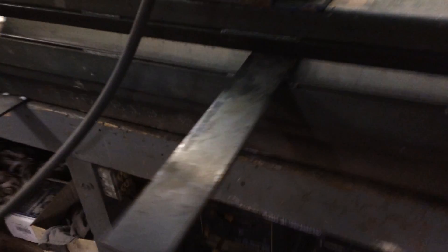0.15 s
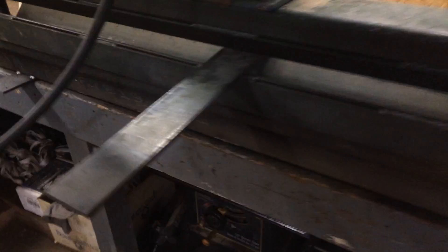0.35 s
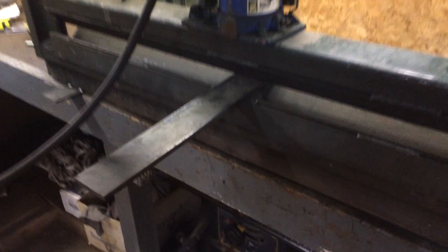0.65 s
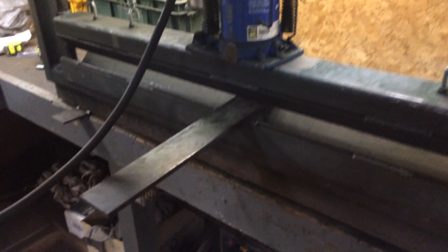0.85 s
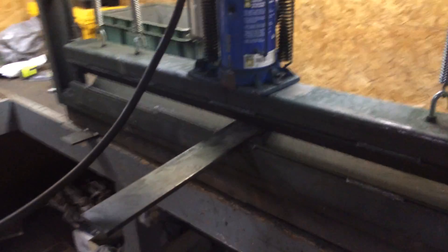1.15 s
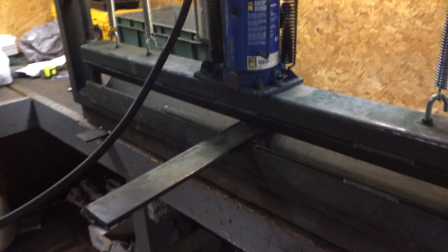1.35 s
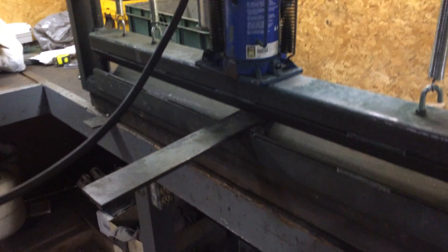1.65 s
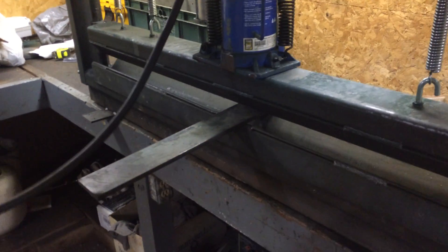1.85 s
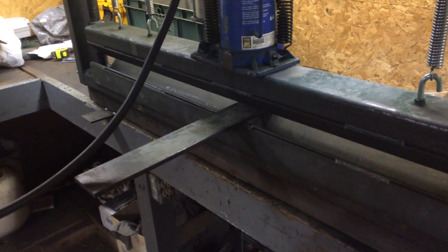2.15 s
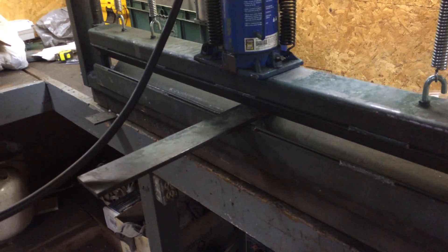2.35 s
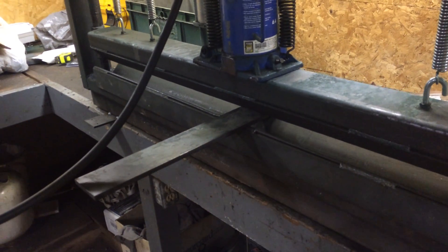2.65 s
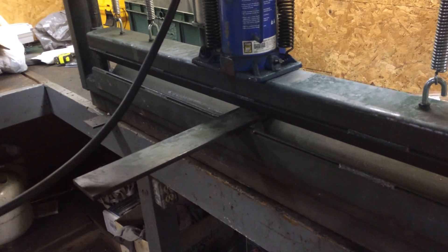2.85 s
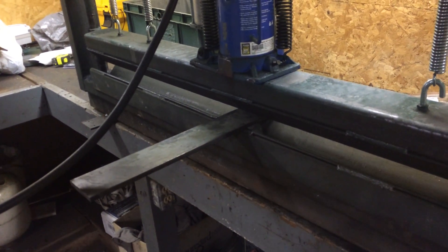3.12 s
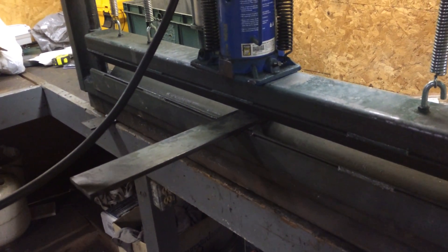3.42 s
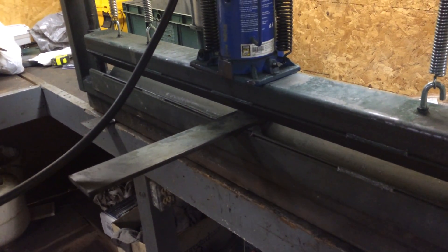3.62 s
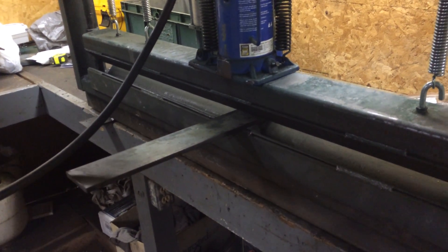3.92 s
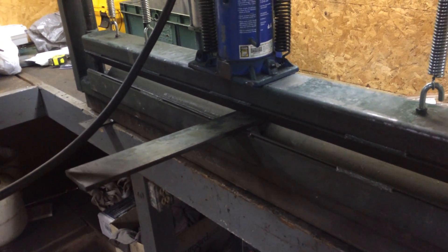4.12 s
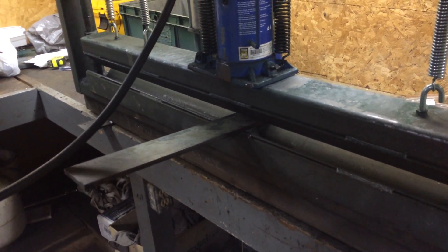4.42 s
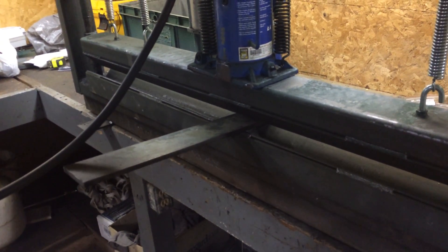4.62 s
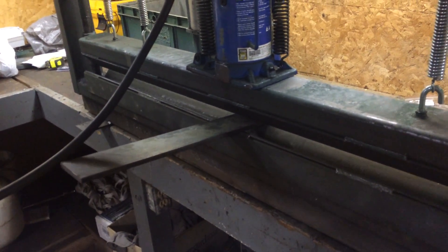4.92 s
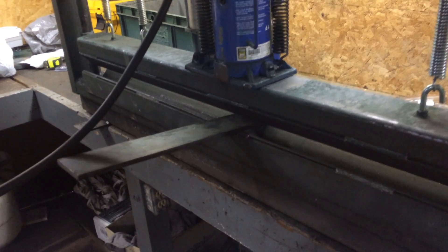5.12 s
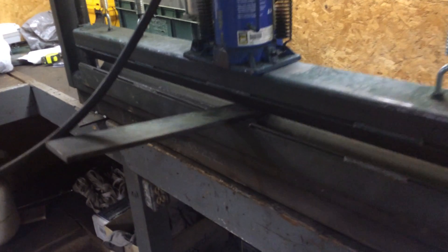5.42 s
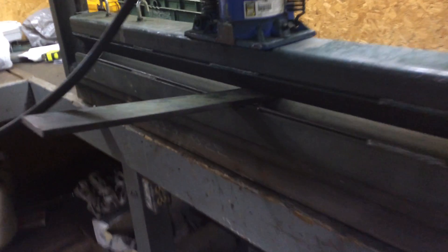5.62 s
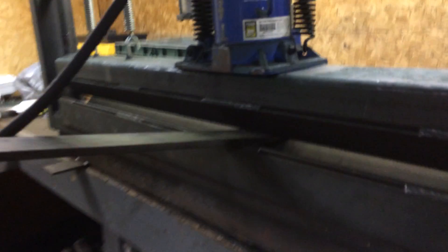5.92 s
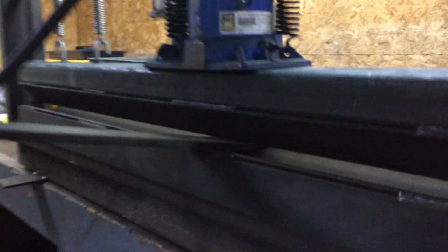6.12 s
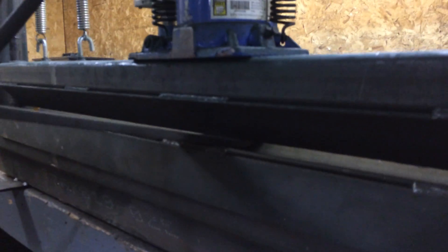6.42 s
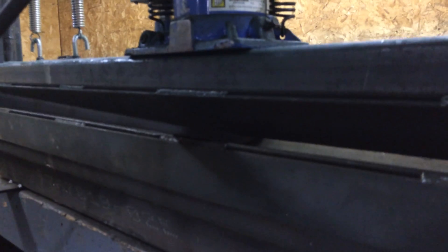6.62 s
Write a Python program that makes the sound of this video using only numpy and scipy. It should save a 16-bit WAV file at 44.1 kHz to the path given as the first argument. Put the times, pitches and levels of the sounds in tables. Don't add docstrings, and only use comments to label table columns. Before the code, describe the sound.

After a last hiss and clank, workshop hum swells, then a pneumatic jack rattles out fast harsh air blasts, with late metal groans and knocks.

```python
import sys
import numpy as np
from scipy import signal
from scipy.io import wavfile
from scipy.ndimage import uniform_filter1d

SR = 44100
rng = np.random.default_rng(int(sys.argv[2]) if len(sys.argv) > 2 else 0)


def pcm_store(signal):
    levels = np.round(np.clip(np.atleast_2d(signal), -1, 1) * 32767)
    wavfile.write(sys.argv[1], SR, levels.astype(np.int16).T)


def boost_factor(decibels):
    exponent = np.asarray(decibels, float) / 20
    return 10 ** exponent


N = 298116
T_S = np.arange(N) / SR
OPEN_S = 1.8593


def evened(x):
    return x / np.sqrt(np.mean(x ** 2) + 1e-20)


def curve(rows):
    at_s, *columns = np.transpose(rows)
    return [np.interp(T_S, at_s, column) for column in columns]


def noise(spectrum, patchy_db, size=256):
    hop_frames = 4 * N // size + 5
    bin_hz = np.fft.rfftfreq(size, 1 / SR)
    real, imag, patches = rng.standard_normal((hop_frames, len(bin_hz), 3)).T
    patches = uniform_filter1d(patches, size=6, axis=0)
    patches = evened(uniform_filter1d(patches, size=6, axis=1))
    f_hz, level_db = np.transpose(spectrum)
    colour_db = np.interp(np.log(bin_hz + 1), np.log(f_hz + 1), level_db, left=-80, right=-80)
    z = (real + 1j * imag) * boost_factor(colour_db[:, None] + patchy_db * patches)
    return evened(signal.istft(z, nperseg=size, noverlap=3 * size // 4)[1][:N])


def eddies(hz):
    b, a = signal.butter(2, 2 * hz / SR)
    return evened(signal.lfilter(b, a, rng.standard_normal(N)))


def resonate(x, hz, width_hz):
    turn = np.exp(2j * np.pi * hz * np.arange(len(x)) / SR)
    r = np.exp(-np.pi * width_hz / SR)
    smooth = signal.lfilter([1 - r], [1, -r], x / turn)
    return 2 * (turn * smooth).real


def add(mix, at_s, sound):
    part = mix[round(at_s * SR):][:len(sound)]
    part += sound[:len(part)]


def compressor():
    # order, level/dB
    strong_orders = [(7, -56), (8, -53), (9, -54), (10, -46), (11, -43), (12, -53), (13, -53), (14, -51),
                     (15, -52), (18, -56), (21, -55), (22, -45), (23, -49), (28, -54), (31, -55), (33, -55),
                     (44, -53), (46, -57), (49, -54), (55, -54), (56, -54), (74, -57), (79, -53), (80, -50),
                     (83, -51), (85, -55)]
    # f/Hz, level/dB
    weak_orders = [(30, -57), (300, -56.5), (440, -68), (500, -53.5), (1000, -67.5), (1200, -59),
                   (1600, -63)]
    stroke_hz, first_stroke_s = 11.582, .0147
    k = np.arange(3, 140)
    scatter, scramble = rng.random((len(k), 2)).T
    f_hz, weak_db = np.transpose(weak_orders)
    level_db = np.interp(k * stroke_hz, f_hz, weak_db) + 10 * np.log10(-np.log(scatter))
    order, strong_db = np.transpose(strong_orders)
    level_db[order.astype(int) - k[0]] = strong_db
    phase = 2 * np.pi * scramble * (k - 10) * (k - 11)
    turn = np.linspace(0, 2 * np.pi, 8192)
    cycle = np.sqrt(2) * boost_factor(level_db) @ np.cos(k[:, None] * turn + phase[:, None])
    return np.interp((T_S - first_stroke_s) * stroke_hz % 1 * 2 * np.pi, turn, cycle)


def shop():
    # f/Hz, level/dB per Hz
    wash_spectrum = [(15, -40), (40, -14), (90, 0.5), (200, -6.5), (420, -15), (600, -11.5), (1000, -7.5),
                     (1500, -11.5), (2300, -15.5), (3500, -19.5), (5500, -22.5), (11000, -27), (15500, -36)]
    # f/Hz, width/Hz, level/dB
    fan_lines = [(268, 0.78, -45), (328, 6.4, -47), (381.4, 7.6, -50.5), (738, 18, -63.5), (860, 23, -57.5),
                 (964, 12, -48), (980, 58, -48.5), (1196, 20, -56), (1180, 20, -52.5), (1312, 28, -58),
                 (1830, 110, -53.5)]
    # f/Hz, level/dB
    steady_tones = [(119.95, -36), (239.9, -47), (328.2, -52), (359.85, -62), (479.8, -52), (1060.5, -51)]
    # t/s, gain/dB
    gain_curve = [(0, -15), (.1, -12), (.2, -9.5), (.27, -8), (.35, 0), (.5, 0), (1.85, -0.5), (1.95, -7),
                  (2.2, -6.5), (2.7, -9), (3.2, -8), (3.9, -9), (5, -8.5), (6.76, -13)]
    wash = boost_factor(-36.5) * noise(wash_spectrum, patchy_db=1.2, size=2048)
    clatter = boost_factor(6.5 * (T_S > OPEN_S))
    white = rng.standard_normal(N)
    fan = sum(boost_factor(db) * evened(resonate(white, hz, width_hz)) for hz, width_hz, db in fan_lines)
    hum = sum(np.sqrt(2) * boost_factor(db) * np.cos(2 * np.pi * hz * T_S) for hz, db in steady_tones)
    gain = boost_factor(curve(gain_curve)[0])
    return gain * (fan + compressor()) + gain ** 1.23 * hum + gain * clatter * wash


def room(x, t60_s):
    at = np.arange(400, SR // 2, 20)
    taps = np.zeros(SR // 2 + 20)
    sign = rng.choice([-1., 1.], len(at))
    taps[at + rng.integers(0, 20, len(at))] = sign * boost_factor(-60 * at / SR / t60_s)
    taps = signal.lfilter(*signal.butter(1, 2 * 6000 / SR), taps)
    return signal.fftconvolve(x, taps / np.linalg.norm(taps))[:N]


def rings(rows, rise_s):
    t, out = np.arange(SR // 4) / SR, np.zeros(N)
    for at_s, hz, db, t60_s, rattle_share in rows:
        rattle = evened(resonate(rng.standard_normal(len(t)), hz, width_hz=270))
        shake = np.sin(2 * np.pi * hz * t) + rattle_share * rattle
        decay = boost_factor(db - 60 * np.maximum(t - rise_s, 0) / t60_s)
        add(out, at_s, decay * np.minimum(t / rise_s, 1) * shake)
    return out


def strokes():
    # stroke number, stroke length/ms
    pace = [(0, 56.6), (12, 58.33), (16, 67.08), (19, 71.96), (23, 75.69), (26, 76.32), (36, 78.76),
            (48, 80.9), (60, 83.65), (66, 83.27)]
    # t/s, hiss/dB, growl/dB re hiss
    drive = [(1.86, -20.5, -7.5), (2.0, -17, -10), (2.2, -19.5, -10.5), (2.45, -19, -15),
             (2.8, -17.5, -17.5), (3.0, -17.5, -11.5), (3.5, -17, -11), (4.3, -17, -11.5),
             (5.1, -16.5, -11.5), (5.7, -16, -12.5), (6.2, -15.5, -10.5), (6.75, -16, -8.5)]
    # stroke length/ms, leak/dB
    seal = [(56.6, -16.5), (58.3, -25), (67, -29), (76, -32.5), (83, -33)]
    # t/s, extra push/dB, extra flutter/dB
    slams = [(1.92, 4, 4.5), (1.97, 15, -3), (2.2, -8, 0), (2.43, -1, -2), (2.55, 6, 3.5), (2.67, 10, 1),
             (3.37, 2, -2), (3.445, 6, 2.5), (3.52, 4, 2.5), (3.6, 11, 4), (3.905, 8.5, 0), (3.98, 11, 2),
             (4.217, -2, 1.5), (4.53, 4, 4.5), (4.69, 10, -4), (4.85, 6, 0.5), (4.93, -4, 2), (5.17, 2, 1),
             (5.415, 9, 2.5), (5.58, 10, 2.5), (5.82, 10, 6), (5.99, 15, 3.5), (6.07, 8, 1.5),
             (6.155, 9.5, 5.5), (6.24, 11.5, 6.5), (6.405, 8, 3), (6.49, 2, 5.5), (6.572, 6, 2),
             (6.655, 12.5, 3.5), (6.74, 7, 5.5)]
    number, number_ms = np.transpose(pace)
    length_ms = np.interp(np.arange(number[-1] + 1), number, number_ms)
    at_s = OPEN_S + (np.cumsum(length_ms) - length_ms) / 1000
    drive_s, *drive_db = np.transpose(drive)
    hiss_db, growl_db = (np.interp(at_s, drive_s, column) for column in drive_db)
    slam_db = np.zeros((len(at_s), 2))
    for slam_s, *extra_db in slams:
        slam_db[np.argmin(abs(at_s - slam_s))] = extra_db
    slam_push_db, slam_flutter_db = slam_db.T
    uneven_db = rng.standard_normal((len(at_s), 3)) * [0.55, 0.7, 4]
    uneven_roar_db, uneven_flutter_db, uneven_push_db = uneven_db.T
    rise_db = growl_db + 11
    roar_db = growl_db + uneven_roar_db + 0.23 * slam_flutter_db
    flutter_db = -18 + 0.25 * rise_db + slam_flutter_db + uneven_flutter_db
    push_db = -35.5 + 0.97 * rise_db + slam_push_db + uneven_push_db
    leak_db = np.interp(length_ms, *np.transpose(seal))
    return np.transpose([at_s, hiss_db, roar_db, flutter_db, push_db, leak_db])


def pushes(beats):
    # t/s, level/dB
    frame_curve = [(1.84, -80), (1.88, -46), (2.3, -38.5), (3, -40.5), (4, -45.5), (5, -44), (5.8, -44.5),
                   (6.76, -34.5)]
    # f/Hz, level/dB per Hz
    rumble_spectrum = [(25, -35), (50, 0.5), (85, 0), (130, -15), (200, -1), (350, -39)]
    t, out, shake = np.arange(6000) / SR, np.zeros(N), np.zeros(N)
    kick = boost_factor(-15.0) * np.hanning(200)
    tremor = boost_factor(-60 * t / 0.18) * np.minimum(t / 0.0021, 1)
    spreads = rng.uniform(0.853, 1.2, (len(beats), 2))
    for beat, (swing_spread, frame_spread) in zip(beats, spreads):
        at_s, size = beat[0], boost_factor(beat[4] + 5.0)
        swing = np.sin(2 * np.pi * 118 * swing_spread * t) * boost_factor(-60 * t / .048)
        frame = boost_factor(-35.5 - 60 * t / 0.23) * np.sin(2 * np.pi * 85 * frame_spread * t)
        frame = frame * np.minimum(t / 0.0066, 1)
        add(out, at_s - .0005, -size * swing - frame)
        add(out, at_s - .005, size * kick)
        add(shake, at_s, tremor)
    rumble = shake * noise(rumble_spectrum, patchy_db=1.0, size=2048)
    return out + boost_factor(curve(frame_curve)[0] + 5.0) * rumble


def exhaust(beats):
    # t/s, level/dB, t60/s
    last_puffs = [
        (0.0, -11.5, 0.13),
        (0.039, -20, 0.12),
        (.098, -55, 0.069),
    ]
    # t/s, leak/dB
    valve = [
        (1.79, -65),
        (1.82, -41),
        (1.84, -34),
        (1.858, -30),
    ]
    # t after port opens/s, hiss/dB, roar/dB, flutter/dB
    blast_shape = [(0, -5.5, -7, -32), (.0015, -3.5, -5, -5.5), (.006, 0.5, -1, 1.5), (0.022, 1, 0.5, 0),
                   (0.029, -0.5, -3, -4), (.045, -5.5, -11, -17), (0.061, -13.5, -18, -29),
                   (.07, -26, -18, -27), (.09, -44, -39, -30)]
    # f/Hz, level/dB per Hz
    jet_spectrum = [(1290, -13), (2200, -10.5), (2850, -13.5), (3680, -7.5), (5130, -5.5), (6160, -3.5),
                    (6640, -3), (14600, 0.5), (15600, -2), (16000, -26)]
    roar_spectrum = [(800, -23), (1200, -1), (1700, -2), (2000, 3.5), (2200, 0.5), (2450, 0), (2900, 0.5),
                     (4200, -7)]
    flutter_spectrum = [(120, -37), (250, 2), (450, 5), (800, 4.5), (1150, 0), (1700, -33)]
    at_s, hiss_db, roar_db, flutter_db, _, leak_db = np.transpose(beats)
    last = np.maximum(np.searchsorted(at_s, T_S) - 1, 0)
    age_s = T_S - at_s[last]
    running = age_s > 0
    stretch = (np.gradient(at_s)[last] / 0.066) ** 0.15
    shape_s, *shapes_db = np.transpose(blast_shape)
    blasts = [boost_factor(hiss_db[last] + np.interp(age_s / stretch, shape_s, shape_db)) * running
              for shape_db in shapes_db]
    running_leak_db = np.interp(T_S, at_s, leak_db) - 2.0
    leak = boost_factor(np.where(running, running_leak_db, curve(valve)[0])) * (T_S > valve[0][0])
    puffs = sum(boost_factor(db - 60 * abs(T_S - puff_s) / t60_s) * (T_S >= puff_s)
                for puff_s, db, t60_s in last_puffs)
    hiss = np.hypot(blasts[0], leak) + puffs
    roar = np.hypot(blasts[1] * boost_factor(roar_db[last]), leak * boost_factor(-50.0)) + puffs * boost_factor(-15)
    flutter = np.hypot(blasts[2] * boost_factor(flutter_db[last]), leak * boost_factor(-21.0)) + puffs * boost_factor(-16.5)
    gust_db = 0.42 * eddies(hz=256)
    hiss = hiss * noise(jet_spectrum, patchy_db=1.5, size=512) * boost_factor(gust_db)
    roar = roar * noise(roar_spectrum, patchy_db=2.2) * boost_factor(gust_db + 1.6 * eddies(hz=120))
    flutter = flutter * noise(flutter_spectrum, patchy_db=3.0, size=512)
    return hiss + roar + flutter * boost_factor(gust_db + 0.67 * eddies(hz=82.6))


def scene():
    # t/s, f/Hz, level/dB, t60/s, rattle share
    struck = [(0, 180, -20, .06, .2), (0, 93, -26, .09, .1), (0, 940, -30, 0.14, .6),
              (.045, 2600, -33, .09, 1.5), (.062, 1990, -36, .25, .6), (.07, 1400, -43, 0.23, 1.2),
              (.076, 3200, -35, 0.2, .6), (.08, 1700, -41, .2, .6), (.098, 1600, -38, 0.08, 1.7),
              (0.5, 2800, -49, .15, 1.5), (1.858, 1550, -28, 0.087, .8), (1.858, 966, -30, 0.09, .8),
              (1.972, 110, -28, .06, .1), (6.28, 1150, -31, .12, 1.7), (6.29, 730, -28, 0.07, 1.2),
              (6.495, 560, -27, .07, 1.2), (6.58, 600, -28, .09, 1.2), (6.668, 550, -27, .1, .8),
              (6.748, 560, -24, .06, .6)]
    # t/s, f/Hz, level/dB, t60/s, rattle share
    groaning = [
        (.05, 620, -41, .25, 1.7),
        (.12, 1900, -53, .5, 1.7),
        (.19, 330, -44, .3, 1.2),
        (.43, 370, -41, .25, .4),
        (1.828, 4750, -34, .2, .3),
        (6.28, 900, -24, .08, .5),
        (6.283, 603, -24, .07, .5),
        (6.305, 510, -25, 0.09, .5),
        (6.33, 430, -36, .1, .4),
    ]
    beats = strokes()
    steel = rings(struck, rise_s=0.0024) + rings(groaning, rise_s=0.013)
    jack = exhaust(beats) + pushes(beats) + steel
    room_ring = boost_factor(-11) * resonate(jack, hz=2205, width_hz=35)
    echo = boost_factor(-17.5) * room(jack, t60_s=0.34)
    return np.tile(jack + room_ring + echo + shop(), (2, 1))


def band_limit(x):
    return signal.sosfilt(signal.butter(12, 16550, fs=SR, output="sos"), x)


def record(dry):
    band = signal.firwin(511, 15340, window=("kaiser", 9), fs=SR)
    x = signal.oaconvolve(dry, band[None], "same")
    x = signal.lfilter(*signal.butter(1, 2 * 35 / SR, "high"), x)
    over = np.maximum(abs(x) - .55, 0)
    mix = x - np.sign(x) * (over - 0.15 * np.tanh(over / .16))
    return band_limit(mix)


dry = scene()
out = record(dry)
pcm_store(out)
```